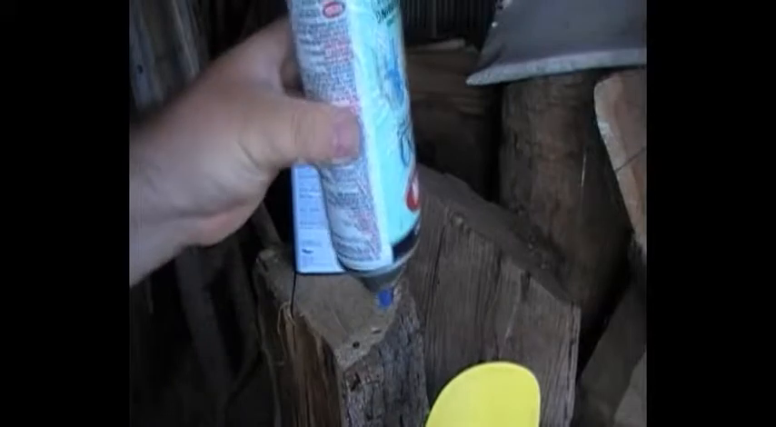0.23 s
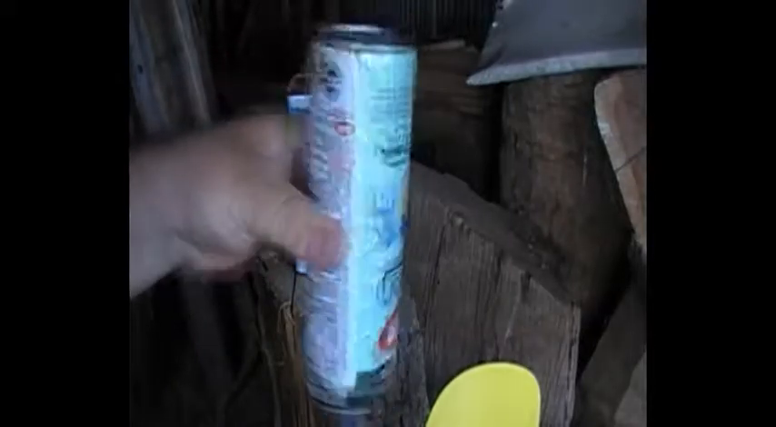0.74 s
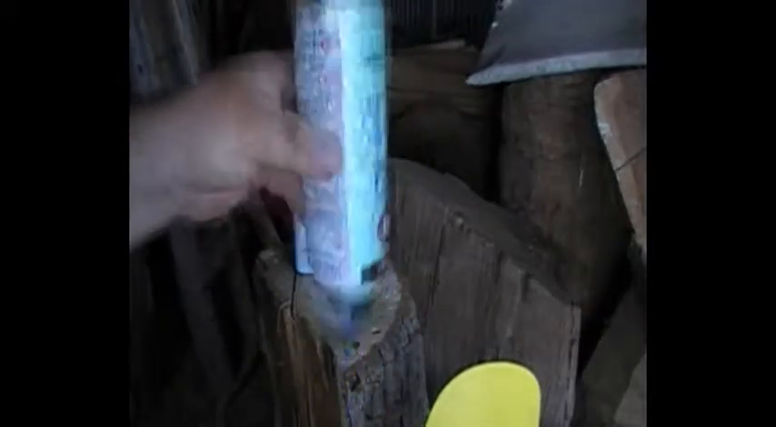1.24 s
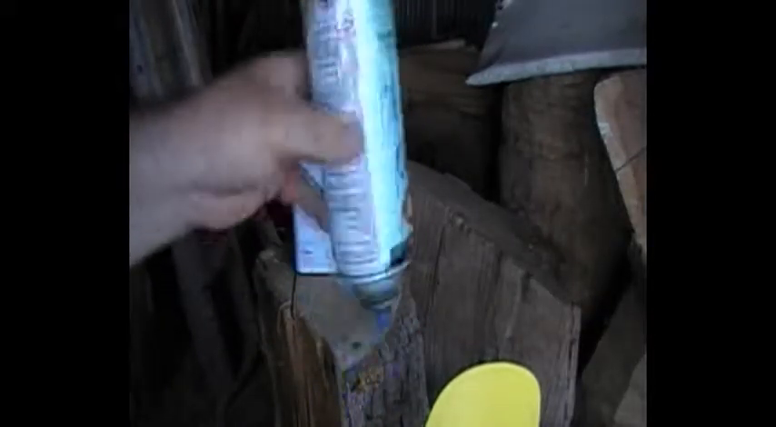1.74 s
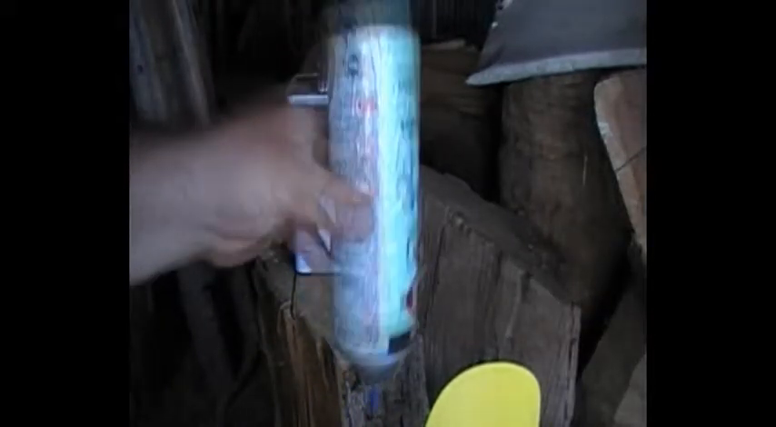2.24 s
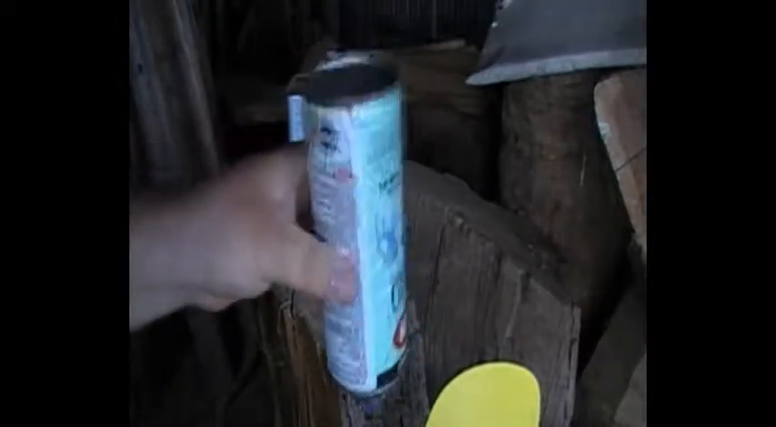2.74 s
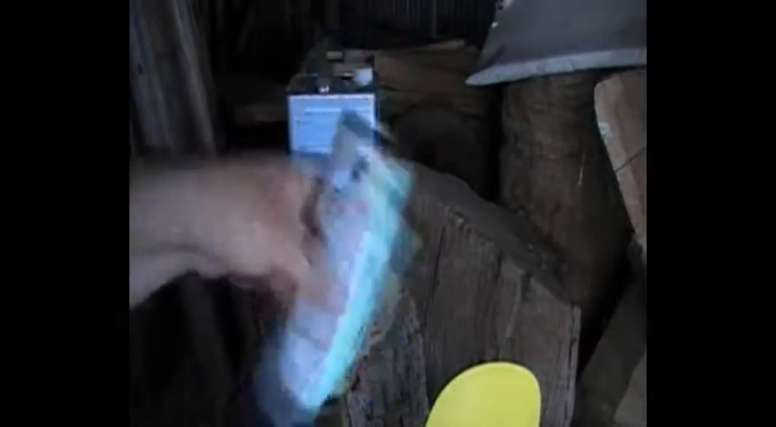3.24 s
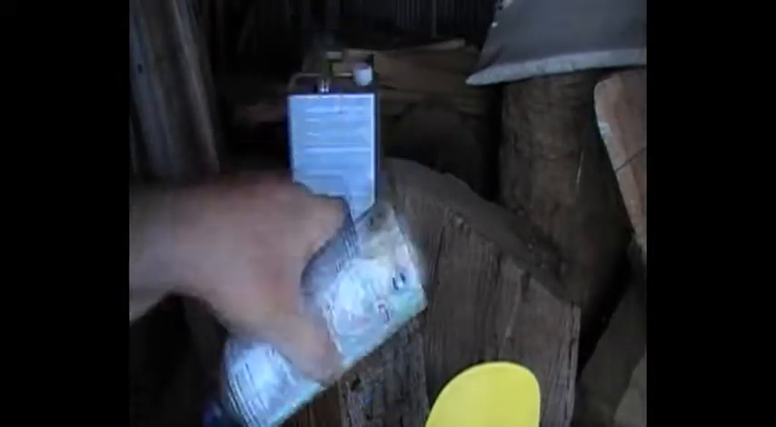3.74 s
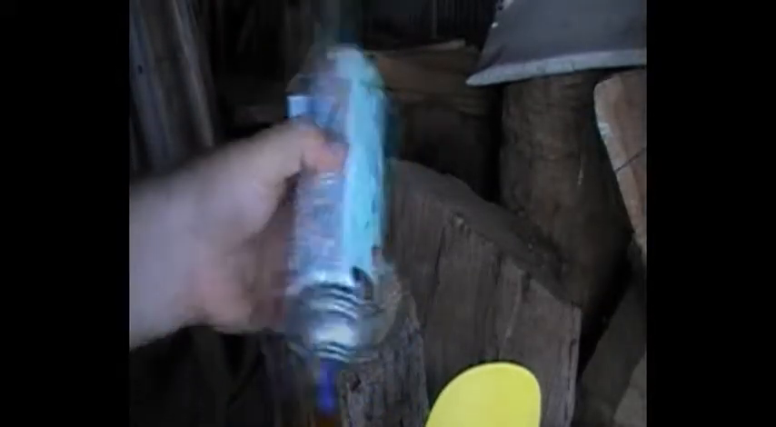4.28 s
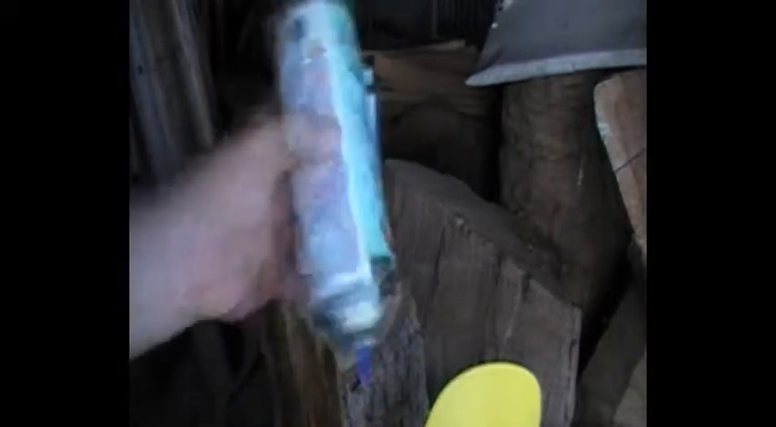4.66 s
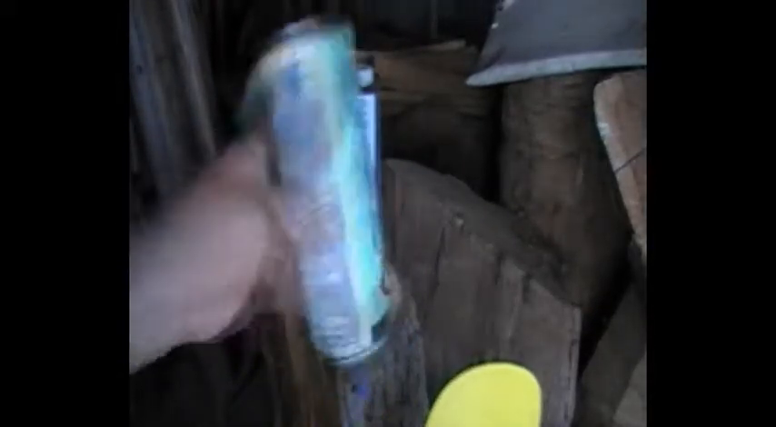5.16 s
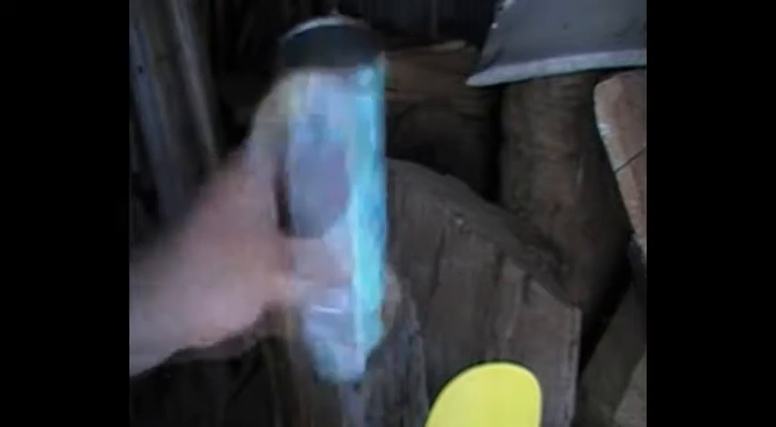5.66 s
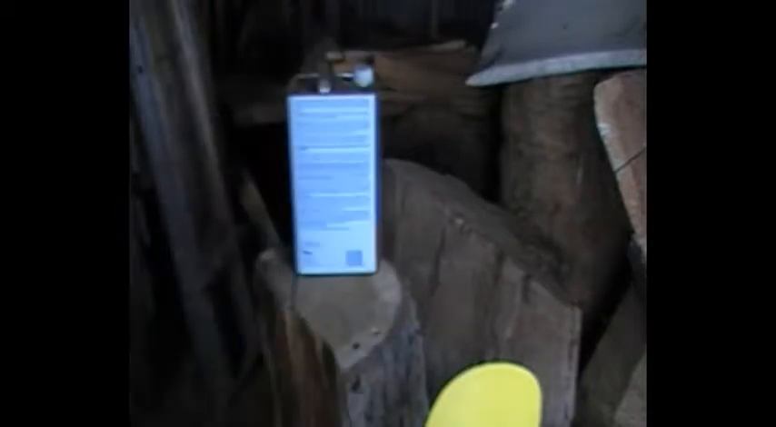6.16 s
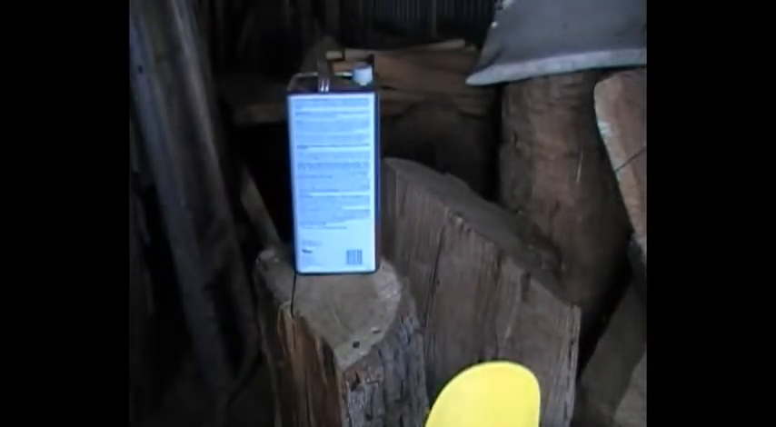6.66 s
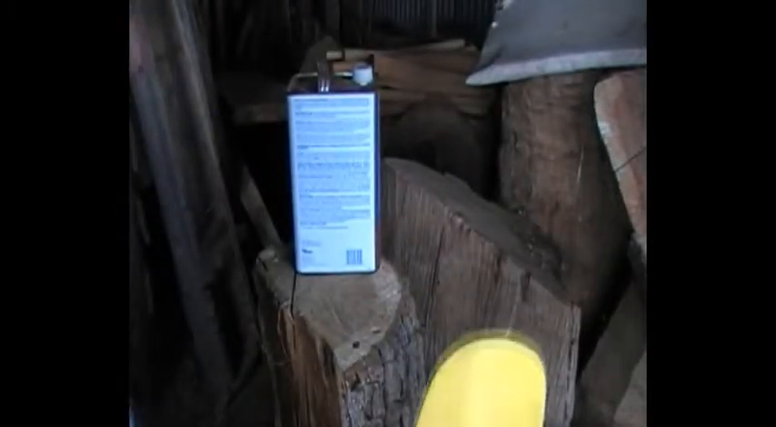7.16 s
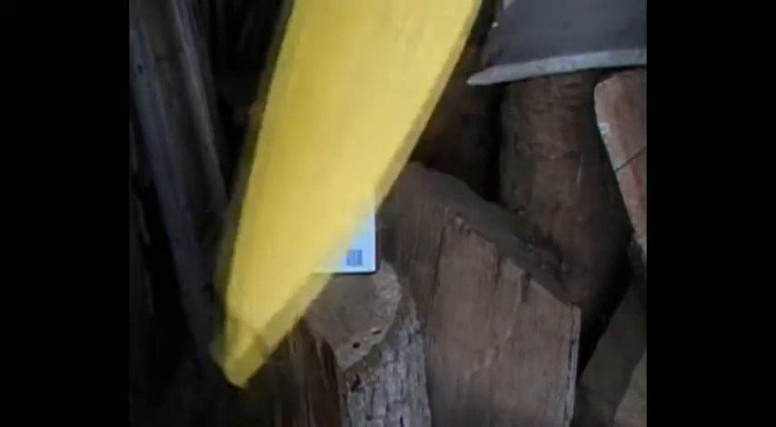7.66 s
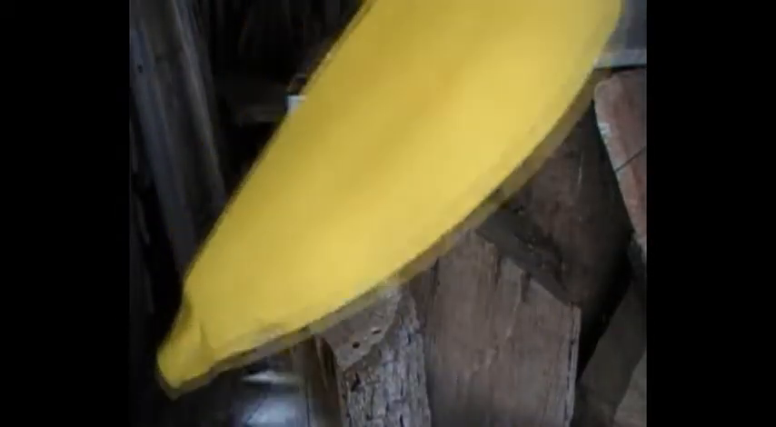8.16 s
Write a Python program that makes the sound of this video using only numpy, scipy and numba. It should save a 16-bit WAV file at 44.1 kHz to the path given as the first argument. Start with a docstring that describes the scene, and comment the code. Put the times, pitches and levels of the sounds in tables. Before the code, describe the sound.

Close, hard rattling of the mixing ball in a shaken spray can, with brief lulls and faint outdoor hiss behind.

```python
"""Short hard clicks, small ticks and a wet swish: a spray can is shaken close by in an open wood shed.
The mixing ball inside strikes the metal wall, skips along it and stirs the paint. The paint stops the
ringing quickly, and the planks answer with a brief echo. Twice the can knocks on wood.
Behind it are insects, a low hum, distant hiss and wind on the microphone.
The loudest clicks turn the volume down for a moment, and their peaks are clipped."""
import sys
import numpy as np
from scipy import signal
from scipy.fft import rfft, irfft
from scipy.io import wavfile
from scipy.ndimage import uniform_filter1d
from numba import njit

SR = 44100
rng = np.random.default_rng(int(sys.argv[2]) if len(sys.argv) > 2 else 0)


def wav_record(signal):
    """Record a signal, one row per channel, as 16-bit PCM in the file named by sys.argv[1]."""
    frames = np.transpose(np.atleast_2d(signal))
    bounded = np.clip(frames, -1, 1)
    # unit amplitude maps onto the largest positive 16-bit level
    quanta = np.round(bounded * 32767).astype(np.int16)
    wavfile.write(sys.argv[1], SR, quanta)


N = 371322

# the can's modes, the tones it rings with when struck: f/Hz, level/dB
CAN_MODES = [(650, -21.5), (950, -16), (1300, -6.5), (1660, -3.5), (2050, -2), (2450, -2.5), (2850, -3),
             (3250, -2), (3750, -2.5), (4350, -3.5), (5200, -3.5), (6200, 4.5), (7300, 6), (8500, 2.5),
             (9800, -0.5), (11500, -7), (13500, -15.5), (15500, -42)]
# a loose grip frees the can's deep tones: t/s, gain of the modes under 1 kHz/dB
LOOSE_GRIP = [(0, 14.5), (.3, 3.5), (.8, -1), (5.9, -7), (6.1, 13.5), (7.1, 9), (7.5, 5.5), (8.42, 8.5)]
# runs of skips as the ball settles: start t/s, length/s, level/dB, struck spot f/Hz, typical gap/s
SKIP_RUNS = [(0.753, 0.029, -37.5, 1180, 0.015), (1.025, .07, -37, 2300, .01),
             (1.203, 0.054, -28, 2280, .008), (1.275, 0.039, -32, 1890, 0.0068),
             (1.346, 0.03, -44, 2090, 0.0046), (1.382, .01, -32, 1900, .012),
             (1.418, .045, -28.5, 3010, 0.0095), (1.474, 0.047, -32.5, 1954, .008),
             (1.525, 0.035, -32.5, 2100, .011), (1.716, .14, -29, 1730, .016),
             (2.173, 0.09, -33.5, 1490, 0.0095), (2.451, 0.016, -33, 1590, 0.011),
             (2.529, 0.056, -26.5, 2110, 0.018), (2.601, 0.083, -31, 1460, 0.0085),
             (2.723, .04, -30, 3150, 0.0085), (2.783, .05, -36, 1900, .011),
             (2.846, 0.066, -33.5, 1460, .018), (3.362, 0.027, -27.5, 2290, 0.0043),
             (3.5, 0.034, -30, 2570, 0.0088), (3.846, 0.037, -25.5, 3000, 0.0068),
             (4.091, 0.07, -25, 2840, 0.0051), (4.232, 0.027, -32, 2130, 0.0048),
             (4.386, 0.13, -31.5, 3200, .012), (4.815, 0.055, -36, 1800, 0.0095),
             (5.142, 0.044, -24.5, 1600, 0.011), (5.205, 0.025, -30, 1610, 0.0087),
             (5.498, .04, -25, 2460, 0.013), (5.716, 0.039, -27.5, 2600, .007),
             (6.13, 0.069, -25, 1570, 0.0054), (6.977, 0.086, -39, 1600, 0.019),
             (7.065, .07, -35, 4000, 0.016), (8.325, 0.039, -31, 1450, 0.011),
             (8.388, 0.025, -26.5, 1400, 0.0064)]
SKIP_FADE_DB = 4  # each run gets this much quieter by its end


def ball_clicks():
    """The ball hits the wall; each click echoes differently because the can keeps moving."""
    # hits of the ball: t/s, level/dB, struck spot f/Hz, hardness (extra treble)/dB
    blows = [(0.018, -27.5, 2100, 6), (0.0635, -17.5, 1200, -4.5), (0.1604, -15, 1838, -9),
             (0.2465, -13.5, 955, -22), (0.2551, -11.5, 3470, 2), (0.266, -22, 3500, -21),
             (0.315, -15.5, 3120, -8), (0.453, -20, 3240, -5.5), (0.4958, -31, 2950, -45),
             (0.8, -28.5, 1550, -62), (0.8991, -12, 2290, -6.5), (0.9414, -18, 2540, -3),
             (0.9738, -22.5, 4300, -5), (1.0014, -25, 3490, -4), (1.0202, -25.5, 2340, -12),
             (1.108, -17.5, 2350, -13), (1.1244, -19.5, 3240, -13), (1.1476, -15.5, 1850, -12),
             (1.1722, -15.5, 3570, -6), (1.1964, -19, 3420, 1), (1.3673, -14, 3500, -3.5),
             (1.3951, -20, 3280, -8), (1.408, -24, 3320, -4), (1.484, -30.5, 2330, -5),
             (1.621, -11, 3640, -4.5), (1.66, -13, 2420, -7.5), (1.7001, -18.5, 3500, -10),
             (1.746, -26, 1870, -5), (1.8737, -11, 3680, -3), (1.923, -22.5, 2000, 0),
             (1.9541, -19, 1880, -5), (1.9768, -19, 1990, -7), (2.0006, -21, 2000, -9.5),
             (2.022, -26, 1640, -8), (2.0363, -22.5, 1400, -9), (2.0563, -20.5, 2360, -10),
             (2.0666, -11, 3270, -5), (2.1062, -19, 3320, -6), (2.1222, -22, 4270, -9),
             (2.1514, -21.5, 3660, -5), (2.157, -26, 1760, -15), (2.17, -21, 1850, -12.5),
             (2.188, -26, 1200, -14), (2.2731, -10.5, 3900, -4), (2.3059, -19.5, 3680, -2.5),
             (2.3336, -26.5, 2120, -13), (2.3688, -21.5, 1690, -4.5), (2.39, -19, 1900, -20),
             (2.4103, -23.5, 1230, -7), (2.4289, -25, 2060, -7), (2.4772, -11, 3800, -4.5),
             (2.5086, -13.5, 3870, -5.5), (2.5944, -23.5, 4600, -6), (2.6987, -15, 3800, 6.5),
             (2.716, -23.5, 3580, -13), (3.022, -15, 3500, -0.5), (3.092, -25, 1970, -15),
             (3.1152, -21.5, 2470, -2.5), (3.178, -24, 2300, -46), (3.1913, -12.5, 2630, -7.5),
             (3.2449, -17, 2420, -3), (3.2951, -12, 2470, -13), (3.3161, -16, 3200, -2),
             (3.3392, -22.5, 3800, -2), (3.351, -22, 2350, -10), (3.3592, -24, 2280, 4),
             (3.394, -14.5, 3650, -8), (3.408, -23, 3580, -24), (3.4166, -13.5, 3350, -7),
             (3.4388, -11, 2290, -15), (3.4532, -14.5, 3000, -4), (3.468, -18, 3150, -4),
             (3.477, -22, 2970, -11), (3.4882, -17, 3140, -3.5), (3.5215, -22.5, 2230, -3),
             (3.5485, -10, 3920, -5), (3.5734, -11, 2170, -13), (3.5918, -17.5, 2220, -12),
             (3.6433, -9.5, 2400, -70), (3.662, -19, 3240, -9), (3.6902, -19, 2240, -8),
             (3.7271, -24.5, 3250, -4), (3.745, -21, 2200, -15), (3.7675, -21, 2350, -14),
             (3.8, -21.5, 1670, -10), (3.825, -12.5, 3700, -13), (3.839, -19.5, 3700, -4),
             (3.9326, -16, 1940, -8.5), (3.9851, -11, 3680, -5.5), (4.0363, -26.5, 2420, -33),
             (4.0905, -14.5, 3320, 0.5), (4.117, -16.5, 1570, 1), (4.1335, -15.5, 1560, -9),
             (4.1538, -17, 3020, -9), (4.1731, -24, 3270, -10), (4.1841, -23.5, 3200, -11),
             (4.353, -11.5, 3230, -7), (4.384, -29, 3820, 5), (4.4523, -22.5, 1400, -2),
             (4.4648, -15.5, 4110, -1), (4.483, -15.5, 2300, -10), (4.4938, -13.5, 3800, -10),
             (4.5589, -14, 1590, -20), (4.5791, -14, 2400, -11), (4.629, -16.5, 1500, -14),
             (4.6827, -8, 3330, -7), (4.7716, -12.5, 3200, -5.5), (4.7882, -11, 2970, -1.5),
             (4.7971, -18, 3740, -16), (4.807, -19, 2480, -33), (4.8453, -23.5, 1640, -36),
             (4.8882, -7.5, 4200, -7.5), (4.9854, -7, 3690, 1), (5.055, -10, 3260, 1.5),
             (5.118, -11, 3840, -5.5), (5.129, -17.5, 2020, -10), (5.181, -10, 3180, 4),
             (5.1962, -25, 2660, -12), (5.2386, -11, 4730, 1), (5.2682, -10.5, 2650, -5),
             (5.309, -30, 1430, -13), (5.3248, -12.5, 3230, -6.5), (5.3498, -16, 2850, -6),
             (5.3644, -20.5, 2910, 1), (5.376, -15.5, 3800, -7), (5.383, -20, 3300, -15),
             (5.409, -14.5, 3740, -17), (5.4395, -14.5, 1740, -5), (5.4678, -21.5, 1340, -9),
             (5.4861, -10, 2640, -11), (5.4933, -22, 2600, 1), (5.5103, -24, 2300, 6),
             (5.5666, -8.5, 3670, -13.5), (5.609, -15, 2100, -3), (5.641, -8, 3760, -6.5),
             (5.6492, -19.5, 2820, -9), (5.692, -19.5, 3680, -3), (5.7003, -17.5, 2800, 0),
             (5.707, -14.5, 3800, -9), (5.7127, -19, 2470, -2), (5.7548, -16, 3400, -12),
             (5.773, -26, 1320, -13), (5.7979, -13.5, 2450, -4), (5.8101, -20.5, 2350, -15),
             (5.8198, -13, 3000, -7.5), (5.8735, -26, 1280, -4), (5.9147, -21.5, 2000, 3),
             (5.9494, -29, 1880, 0), (5.9705, -25, 1330, -5), (6.109, -18, 1530, -9),
             (6.1159, -19.5, 1590, -10), (6.12, -26, 1520, -5), (6.125, -18.5, 1330, -11),
             (6.192, -25, 2000, -7), (6.206, -26, 2070, -16), (6.346, -15, 1560, -12),
             (6.3829, -24, 1190, -7.5), (6.4135, -23.5, 1270, -13), (6.4324, -26, 1330, -14),
             (6.5244, -19, 2660, -10), (6.583, -29, 2660, -11), (6.616, -15.5, 1940, -13),
             (6.6918, -14, 1484, -6.5), (6.7132, -20, 2670, -18), (6.7772, -18.5, 2190, -6.5),
             (6.788, -20.5, 4430, -12), (6.9029, -25.5, 3960, -28), (6.9152, -28.5, 1360, -3),
             (6.9282, -28, 4000, -18), (6.9905, -27.5, 4270, -4), (7.0448, -29.5, 3900, -2),
             (7.5196, -20.5, 1468, -13), (7.5528, -13, 3530, -1.5), (7.6137, -13.5, 1610, -7.5),
             (7.6717, -12, 3940, -2), (7.7351, -21, 4020, 2), (7.7396, -15, 1540, -8),
             (7.7488, -17.5, 3600, -8), (7.7613, -29, 3430, 2), (7.7783, -9, 1400, -10.5),
             (7.8151, -9, 1960, -36), (7.82, -9, 3850, -7), (7.8524, -8, 1370, -9.5),
             (7.8783, -14, 1900, -15), (7.907, -11, 2320, -7.5), (7.9607, -24.5, 3020, 1),
             (7.9676, -9.5, 1940, -7), (7.994, -13.5, 1870, -11), (7.998, -11, 4070, -4),
             (8.039, -7, 1660, -12), (8.068, -16, 2560, -5), (8.0766, -20.5, 2270, -14),
             (8.0857, -15.5, 3850, -7), (8.1054, -21, 3680, -4), (8.131, -11.5, 1890, -6.5),
             (8.1801, -12, 4060, -5), (8.19, -20, 1530, -9), (8.2218, -12.5, 1390, -15),
             (8.2472, -23, 1350, -5), (8.2821, -9.5, 3660, -8.5), (8.304, -27, 1970, 0),
             (8.317, -26, 1550, -7), (8.3809, -27.5, 1670, -1)]
    t = np.arange(512) / SR
    draws = rng.standard_normal((len(blows), 2 * len(CAN_MODES) + 1))
    out = np.zeros((2, N + SR))
    for (start, blow_db, spot_hz, hard_db), draw in zip(blows, draws):
        grip_db = np.interp(start, *np.transpose(LOOSE_GRIP))
        click = undb(blow_db) * can_ring(t, blow_db, spot_hz, hard_db, grip_db, draw[1:])
        # left and right hear the can a little apart in time, which spreads the treble
        direct = spread(click, (.12 + .38 * draw[0]) * np.gradient(click) - .04 * click)
        echo = signal.fftconvolve(click[None], shed_echo(), axes=1)
        i = int(start * SR)
        out[:, i:i + len(t)] += direct
        out[:, i:i + echo.shape[1]] += echo
    return out[:, :N]


def can_ring(t, blow_db, spot_hz, hard_db, grip_db, draw):
    """One hit rings all the can's modes; those near the struck spot's pitch ring louder and longer."""
    # how fast paint and hand stop the ringing: f/Hz, time to fade by 60 dB/s
    damping = [(600, .011), (1500, .007), (3800, .0055), (5500, .0028), (16000, .0016)]
    hz, mode_db = np.transpose(CAN_MODES)
    level_draw, tune_draw = draw.reshape(2, -1)
    # shifting paint retunes the wall on every stroke; the nearest mode takes the spot's pitch
    tuned_hz = hz * (1 + .03 * tune_draw)
    tuned_hz[np.argmin(np.abs(np.log(hz / spot_hz)))] = spot_hz
    nearness = np.exp(-.5 * (np.log2(tuned_hz / spot_hz) / .23) ** 2)  # reaches about .23 octaves
    spot_db = 8 + np.clip(.45 * (-16 - blow_db), 0, 7)  # light hits stay local and sound more pitched
    tone_db = hard_db * (hz > 5500) + grip_db * (hz < 1000)
    gain = undb(mode_db + spot_db * nearness + 2.5 * level_draw + tone_db)
    gain *= undb(.5 * (blow_db + 12) * (hz > 11000))  # only hard hits reach the highest modes
    fade_s = at_pitch(hz, damping) * 1.05 ** nearness
    modes = np.exp(-np.log(1000) * t / fade_s[:, None]) * np.sin(2 * np.pi * tuned_hz[:, None] * t)
    direction = (-1) ** np.arange(len(hz)) * np.sign(tune_draw[0])  # neighbours start opposite ways
    contact_s = .00003 * undb(-.6 * hard_db)  # softer contacts last longer
    click = (gain * direction) @ modes * (1 - np.exp(-t / contact_s))
    click = cut(click, 450, "highpass")  # a small can gives off no bass
    return click / np.sqrt(np.mean(click[:176] ** 2))  # strength 1 over the first 4 ms


def ball_skips():
    """The ball skips along the wall in runs of soft, uneven ticks that ring the can."""
    t = np.arange(512) / SR
    run_draws = rng.standard_normal((len(SKIP_RUNS), 20, 2 * len(CAN_MODES) + 3))
    ticks = np.zeros(N + len(t))
    for (start, length, db, hz, gap), draws in zip(SKIP_RUNS, run_draws):
        gaps = gap * undb(2 * draws[:, 0])
        for delay, draw in zip(np.cumsum(gaps) - gaps[0], draws):
            if delay <= length and start + delay < N / SR:
                tick_db = db - SKIP_FADE_DB * delay / length + 2.5 * draw[1]
                spot_hz = hz * 2 ** (.2 * draw[2])
                tick = can_ring(t, tick_db, spot_hz, hard_db=-9, grip_db=0, draw=draw[3:])
                i = int((start + delay) * SR)
                ticks[i:i + len(t)] += undb(tick_db) * tick
    ticks = cut(ticks[:N], 4000, "lowpass")  # a film of paint dulls light contacts
    echo = signal.fftconvolve(ticks[None], shed_echo(), axes=1)[:, :N]
    return spread(ticks, 0.16 * np.gradient(ticks)) + echo


def paint_swish():
    """Shaking stirs the paint: a wet swish mixed with the ball's quick, tiny ticks."""
    # bands in which the paint sounds: f/Hz, width/Hz, relative level/dB
    paint_bands = [(1270, 1000, 1.5), (2090, 1500, -0.5), (3400, 2300, -5.5), (7000, 3000, -1.5)]
    # how strongly the shaking stirs the paint: t/s, level/dB
    stirring = [(0, -47), (.75, -53.5), (1.1, -42.5), (1.78, -44.5), (2.11, -44), (2.58, -50),
                (2.88, -50.5), (3.17, -47.5), (3.4, -50), (3.58, -44.5), (3.75, -48), (4.99, -46),
                (5.58, -48), (6.0, -46.5), (6.28, -46), (7.48, -54), (7.75, -35), (8.42, -51.5)]
    gaps_s = .009 * undb(2.5 * rng.standard_normal(int(200 * N / SR)))
    starts = (np.cumsum(gaps_s) * SR).astype(int)
    draws = rng.standard_normal((len(starts), len(paint_bands) + 1))[starts < N].T
    paint = 0
    for (hz, width_hz, db), band_draw in zip(paint_bands, draws[1:]):
        taps = np.zeros(N)
        taps[starts[starts < N]] = undb(3 * draws[0] + 3 * band_draw)
        ticks = level(band(band(taps, hz, width_hz), hz, 2 * width_hz), -4)
        swish = noise_band(hz, width_hz, -5) * undb(3.5 * wander(25))
        paint = paint + undb(db) * (ticks + swish)
    paint = cut(paint, 7000, "lowpass")  # wet contacts have no sparkle
    # the swish also swells under every run of skips
    paint = level(paint, 0) * np.hypot(undb(curve(stirring)), undb(-16) * skip_strength())
    return spread(paint, 0.26 * np.roll(paint, 40))


def skip_strength():
    """How strongly the ball skips at every sample: each run starts at its level and fades."""
    strength = np.zeros(N)
    for start, length, db, _, _ in SKIP_RUNS:
        i, n = int(start * SR), int(length * SR)
        strength[i:i + n] += undb(db - SKIP_FADE_DB * np.arange(n) / n)[:N - i]
    return uniform_filter1d(strength, 441)  # smoothed over 10 ms


def can_thuds():
    """The can is laid down on wood: each dull knock is one low tone that dies at once."""
    # knocks on the wood: t/s, level/dB, f/Hz
    knocks = [(6.092, -25.5, 244), (6.199, -34, 151)]
    t = np.arange(2048) / SR
    out = np.zeros(N)
    for start, db, hz in knocks:
        i = int(start * SR)
        out[i:i + len(t)] += undb(db) * np.exp(-t / 0.0031) * np.sin(2 * np.pi * hz * t)
    return out


def grip_rustle():
    """A low rustle comes up while the can is held loosely."""
    return noise_band(297, 160, -60.5) * undb(curve(LOOSE_GRIP))


def shed_echo():
    """The shed's dull answer to a click: a few echoes off logs and planks, and a short tail."""
    # first echoes off the wood: delay t/s, level/dB
    first_echoes = [(.0036, -20.5), (.0068, -41), (0.013, -34)]
    fade_s, tail_db = 0.11, -11  # time to fade by 60 dB, strength against the click
    t = np.arange(7000) / SR
    envelope = np.exp(-np.log(1000) * t / fade_s) * (1 - np.exp(-t / 0.00017))
    mid, side = rng.standard_normal((2, len(t))) * envelope
    echo = spread(mid, 0.43 * side) * undb(tail_db) / np.sqrt(np.sum(mid ** 2))
    for delay, db in first_echoes:
        echo[:, int(delay * SR)] += undb(db)
    return cut(echo, 9300, "lowpass")


def distant_hiss():
    """A soft, nearly steady hiss from far away, strongest in the low range."""
    # tone colour of the hiss: f/Hz, relative level/dB
    colour = [(30, -73), (70, -15), (180, -1), (400, -6), (800, -4), (1500, -16), (3000, -17),
              (7500, -20.5), (11000, -24), (16000, -61)]
    hz = np.maximum(np.fft.rfftfreq(N, 1 / SR), 1)
    mid, side = irfft(rfft(rng.standard_normal((2, N))) * undb(at_pitch(hz, colour)), N)
    return level(spread(mid, 0.7 * side), -48.5) * undb(0.21 * wander(2.53))


def insects():
    """Insect wings blend into one high, shimmering band of noise."""
    wings = rng.standard_normal((2, N))
    for _ in range(2):
        wings = band(wings, hz=4570, width_hz=560)
    shimmer = undb(2.5 * wander(20) + 1.5 * wander(5))
    return level(spread(wings[0], .6 * wings[1]), -56) * shimmer


def hum():
    """A low hum that wavers, because each tone is a very narrow band of noise."""
    # tones of the hum: f/Hz, level/dB
    tones = [(70, -59.5), (139, -59.5), (360, -58.5)]
    return sum(noise_band(hz, width_hz=10, db=db) for hz, db in tones)


def wind():
    """Wind and one stronger puff buffet the microphone, mostly pushing left and right opposite ways."""
    # strength of the breeze: t/s, level/dB
    breeze = [(0, -64), (2.4, -64), (4.2, -63), (5.3, -77), (5.8, -71), (6.1, -59), (7.1, -62), (8.0, -64),
              (8.42, -69)]
    gust_s, gust_db, rise_db_per_s, fall_db_per_s = 7.61, -26.5, 132, 88
    low_band = signal.butter(1, [45, 120], "bandpass", fs=SR, output="sos")
    rumble = signal.sosfilt(low_band, rng.standard_normal((2, N)))
    opposed, shared = level(rumble * undb(5.7 * wander(10.07)), 0)
    since_gust = np.arange(N) / SR - gust_s
    drop_db = np.where(since_gust < 0, -since_gust * rise_db_per_s, since_gust * fall_db_per_s)
    gust = uniform_filter1d(undb(gust_db - drop_db), int(0.088 * SR))  # rounds off the peak
    return spread(.15 * opposed + .3 * shared, opposed) * np.hypot(undb(curve(breeze)), gust)


def undb(db):
    """Turn decibels into a factor to multiply by."""
    return 10 ** (np.asarray(db) / 20)


def level(x, db):
    """Scale a sound to an average (rms) level."""
    return x * undb(db) / np.sqrt(np.mean(x ** 2))


def curve(table):
    """Read a table of t/s, value at every sample."""
    return np.interp(np.arange(N) / SR, *np.transpose(table))


def at_pitch(hz, table):
    """Read a table of f/Hz, value at the given pitches, with octaves evenly spaced."""
    table_hz, values = np.transpose(table)
    return np.interp(np.log(hz), np.log(table_hz), values)


def band(x, hz, width_hz):
    """Keep the part of a sound around one pitch."""
    return signal.lfilter(*signal.iirpeak(hz, hz / width_hz, fs=SR), x)


def noise_band(hz, width_hz, db):
    """Noise around one pitch, at a set level."""
    return level(band(rng.standard_normal(N), hz, width_hz), db)


def cut(x, hz, kind):
    """Soften what lies above hz ("lowpass") or below it ("highpass")."""
    return signal.lfilter(*signal.butter(2, hz, kind, fs=SR), x)


def wander(rate):
    """A smooth random drift, about 1 in size, with a new target `rate` times a second."""
    hold = int(SR / rate)
    steps = np.repeat(rng.standard_normal(N // hold + 1), hold)
    return 1.44 * uniform_filter1d(uniform_filter1d(steps, hold), hold)[:N]


def spread(mid, side):
    """Make left and right from what they share (mid) and what sets them apart (side)."""
    return np.array([mid + side, mid - side])


@njit
def follow(x, attack, release):
    """Track a sound's strength: attack sets how fast it rises, release how fast it falls."""
    envelope, now = np.empty(len(x)), 0.
    for i in range(len(x)):
        now += (x[i] - now) * (attack if x[i] > now else release)
        envelope[i] = now
    return envelope


def scene():
    """The can just right of centre, with the shed and the outdoors around it."""
    can = grip_rustle() + ball_clicks() + ball_skips() + paint_swish() + can_thuds()
    return can + distant_hiss() + insects() + hum() + wind()


def record(dry):
    """The recorder trims the bass, turns down after loud clicks, clips peaks and cuts the top treble."""
    attack_s, release_s, threshold_db, top_hz = 0.0069, .35, -24.5, 16700
    heard = cut(dry, 35, "highpass")
    strength = follow(np.abs(heard).max(axis=0), 1 / (attack_s * SR), 1 / (release_s * SR))
    gain = np.minimum(undb(threshold_db) / (strength + 1e-9), 1) ** 0.33
    loud = heard * gain * undb(1.0)
    bent = loud + 0.11 * loud ** 2  # the input bends the wave one way: hard hits gain a thump and a snap
    clipped = np.clip(bent, -.88, .88)
    return signal.sosfilt(signal.ellip(10, .2, 85, top_hz, fs=SR, output="sos"), clipped)


dry = scene()
out = record(dry)
wav_record(out)
```